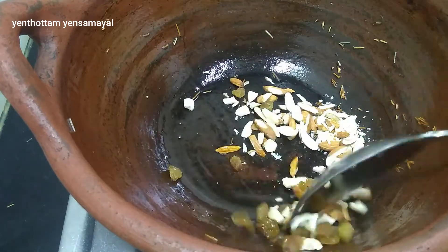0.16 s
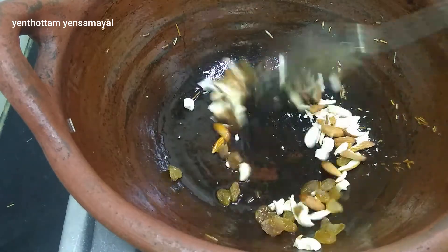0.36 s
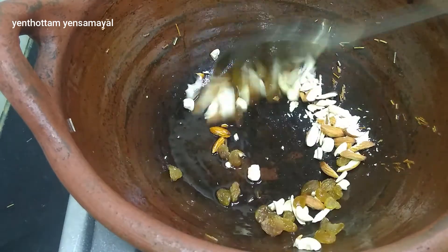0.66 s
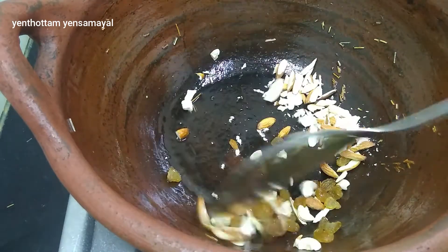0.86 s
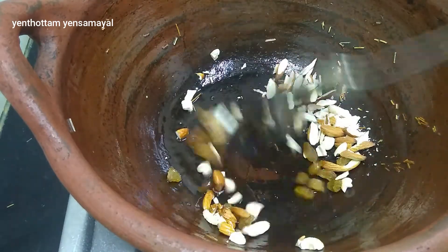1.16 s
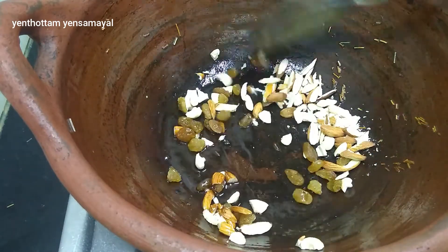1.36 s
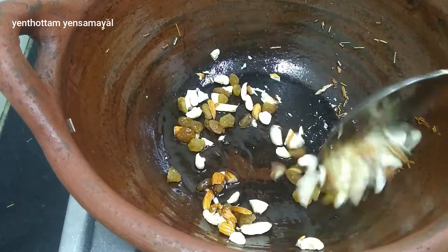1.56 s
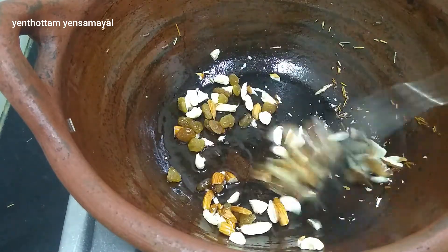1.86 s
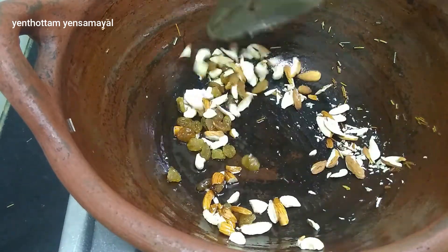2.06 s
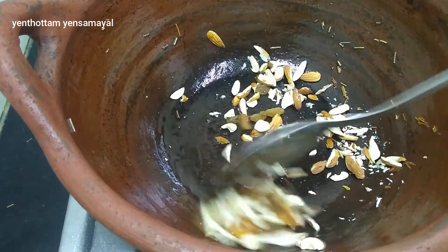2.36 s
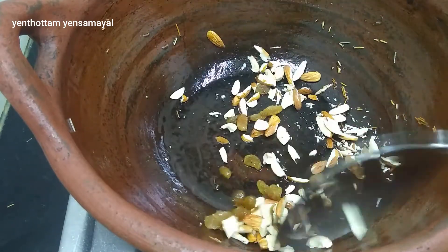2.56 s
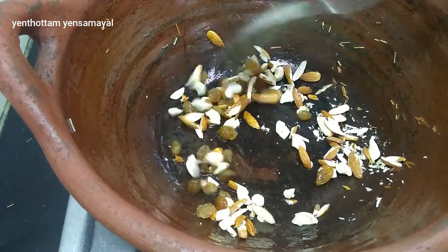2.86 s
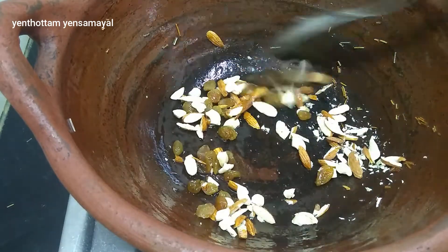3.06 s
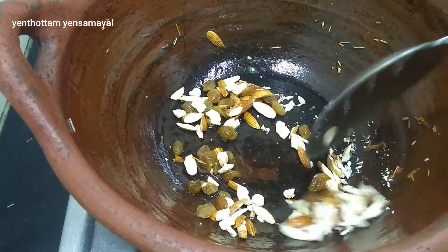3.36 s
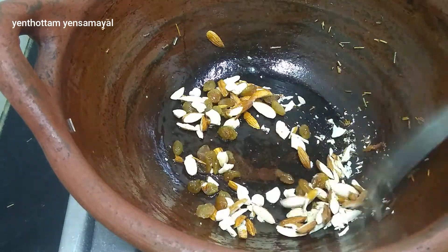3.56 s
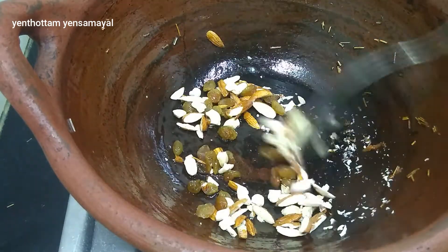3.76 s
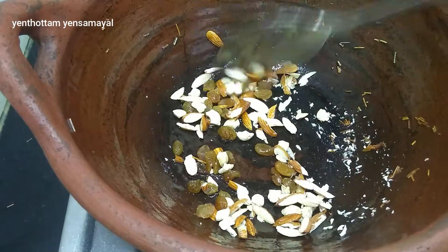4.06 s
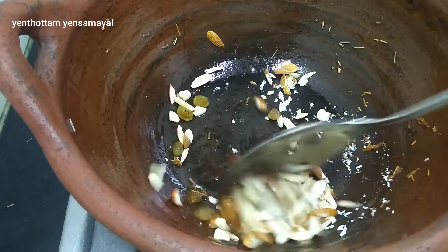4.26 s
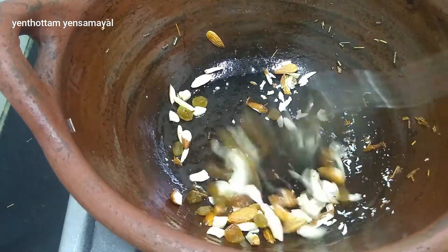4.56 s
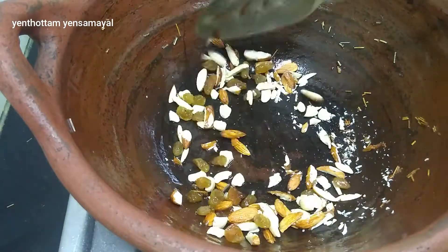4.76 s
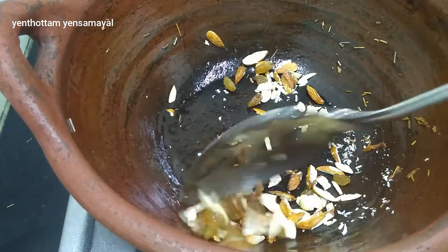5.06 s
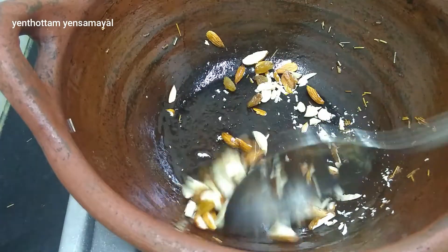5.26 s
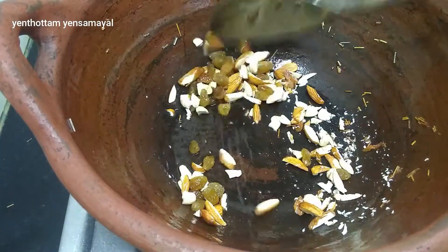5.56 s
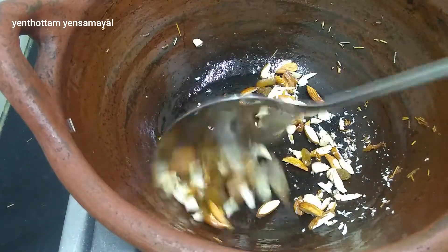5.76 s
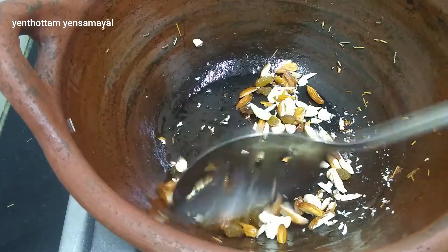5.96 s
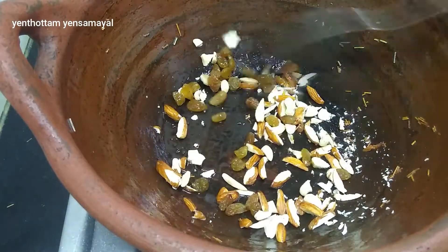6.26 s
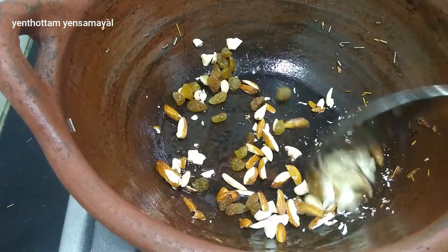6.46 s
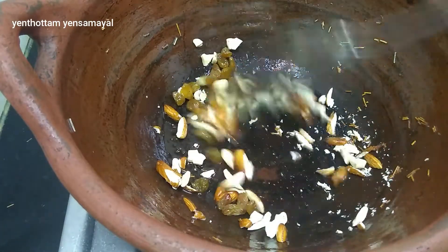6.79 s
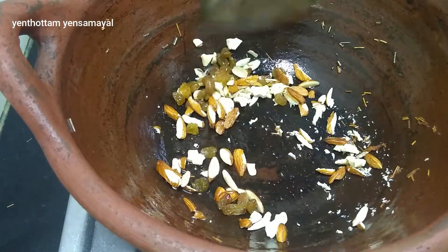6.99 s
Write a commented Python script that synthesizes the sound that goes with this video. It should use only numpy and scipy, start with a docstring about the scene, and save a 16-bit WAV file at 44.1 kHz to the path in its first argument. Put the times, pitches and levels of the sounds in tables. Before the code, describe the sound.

Close, regular knocks and short gritty scrapes of a steel spoon stirring nuts in a clay pot, with a brief kitchen echo.

```python
"""Hard-walled kitchen, close up: a steel spoon stirs nuts and raisins in a little hot fat in a clay pot.
Each stroke lands with a clack of pot and spoon, then drags over the gritty clay in tiny slips.
Loose nuts tick down; bubbles fizz faintly in the fat over a low murmur of air.
The room rings after every stroke; an expander after the microphone pair shuts the quietest gaps."""
import sys
import numpy as np
from scipy import signal
from scipy.fft import rfft, irfft, next_fast_len
from scipy.io import wavfile
from scipy.ndimage import uniform_filter1d

SR = 44100
rng = np.random.default_rng(int(sys.argv[2]) if len(sys.argv) > 2 else 0)


def dump(signal):
    """Clip the signal to [-1, 1] and save it as 16-bit WAV at the path in sys.argv[1]."""
    limited = np.clip(np.atleast_2d(signal).T, -1, 1)
    pcm = np.round(limited * 32767).astype(np.int16)
    wavfile.write(sys.argv[1], SR, pcm)


N = 314433

# spoon landings and bounces: (time [s], level [dB], tilt [0 flat, 1 on edge],
# spot [0 mid-floor, 1 foot of wall], low steel ring [dB], high steel ring [dB])
LANDINGS = [(0.7655, -35, .7, .05, -53, -45), (0.7785, -37, .7, .1, -60, -56),
            (0.784, -42, .7, 0, -65, -65), (1.159, -32.5, 0, .43, -55, -63),
            (1.548, -31, .75, .1, -41, -51), (1.5712, -42, .6, .3, -58, -62),
            (2.0562, -39, .75, 1, -49, -55), (2.369, -42, .9, .75, -54, -56),
            (2.785, -30.5, .05, .5, -52, -70), (3.3495, -37.5, .55, .8, -62, -55),
            (3.36, -41, .75, .85, -49, -60), (3.3719, -33.5, .5, .6, -54, -54),
            (3.3825, -42, .5, .5, -55, -62), (3.7625, -30, 0, .32, -56, -69),
            (4.239, -42, .6, .6, -51, -56), (4.7426, -33.5, .68, .74, -46, -52),
            (5.0185, -36, .87, .55, -49, -53), (5.402, -32, .41, .45, -52, -66),
            (5.7694, -37.5, .95, .05, -55, -60), (6.112, -34, .1, 1, -60, -74),
            (6.4624, -38, .7, .35, -55, -55), (6.485, -43, .7, .9, -60, -60), (6.8346, -33, 0, 0, -48, -70)]
# spoon hits the wall: (time [s], level [dB], cushion [0 bare clay, 1 through nuts])
KNOCKS = [(0.0204, -39, .2), (0.05, -38, .3), (0.0777, -36, 0), (0.0964, -32, 0), (0.1231, -35, .1),
          (0.441, -29, .4), (0.8492, -31, .8), (0.895, -39, .1), (0.907, -38, .3), (1.6414, -27, 0),
          (2.408, -40, .3), (2.515, -36, .7), (4.2811, -38, .8), (4.3071, -42, .4), (4.326, -38, .1),
          (4.335, -36.5, 0), (5.147, -35, .3), (5.5086, -44, 0), (6.5068, -26, 0), (6.5125, -37, 0),
          (6.9068, -37.5, .7)]
# spoon drags: (start [s], length [s], level [dB], bite [0 on nuts, 1 on bare clay], clay pitch [Hz])
DRAGS = [(0.0, .085, -44.5, .48, 1150), (0.39, .17, -56, 0, 1200), (0.852, .062, -46.5, .55, 1200),
         (2.39, .14, -50.5, .42, 1150), (2.955, .052, -63, .32, 1280), (3.14, .16, -73, .3, 1280),
         (3.868, .06, -52.5, .62, 1280), (4.226, .05, -50, .4, 1100), (4.277, .085, -53.5, .95, 1400),
         (4.632, .1, -60, 0, 1280), (5.022, .16, -47.5, .32, 1100), (5.512, .17, -65.5, .75, 1280),
         (5.828, .045, -52.5, .8, 1550), (6.12, .16, -54, 0, 1150), (6.905, .022, -49, .4, 1700)]
# one judder on the wall: (start [s], length [s], level [dB], clay pitch [Hz])
JUDDER = (4.749, .029, -35.5, 1130)
# nuts hit the pot: (time [s], level [dB])
NUT_TICKS = [(0.27, -44), (0.3127, -51), (0.335, -52), (0.821, -42), (1.489, -54), (1.9871, -50.5),
             (2.206, -43.5), (2.321, -50.5), (2.3872, -41), (2.4735, -43), (2.487, -36), (3.041, -55),
             (3.246, -58), (4.069, -49), (4.102, -54), (4.124, -53), (4.359, -38), (4.626, -49.5),
             (4.716, -46), (5.1325, -41), (5.262, -45)]
# joint modes of pot and spoon: (frequency [Hz], level [dB], t60 [s])
POT_MODES = [ (244, -18, 0.08), (326, -20, 0.4), (478, -7, 0.072), (542.4, -2.5, 0.033), (665, 7, 0.015),
             (825, -4, 0.011), (1114, -10.5, 0.072), (1187, -1.5, 0.038), (1313, 2, 0.0082),
             (1650, -10, 0.0061), (1917, 2, 0.018), (2058, 14, 0.0061), (2643, 11, 0.0079),
             (3144, 3.5, 0.019), (3455, 1.5, 0.013), (3757, 3.5, 0.012), (4200, 9.5, 0.0075),
             (5100, -8, 0.028), (5560, -16, 0.02), (8910, -2, 0.045), (10860, 1, 0.0034)]
# thin, lasting modes of the spoon: (frequency [Hz], level [dB], t60 [s])
STEEL_MODES = [(5536, -5, .1), (6949, 0, .14), (7025, -6, .12), (7268, 1, .14), (7595, -8, .1),
               (8215, -10, .14), (9071, -1, .17), (10718, -6, .13), (11490, -14, .12)]
# bands of the four parts, spoon bowl, pot belly, pot wall, spoon edge: (low [Hz], high [Hz])
PART_BANDS = [(2400, 7600), (215, 850), (850, 2300), (7800, 13800)]
# reverberation: (frequency [Hz], t60 [s], level [dB])
KITCHEN_DECAY = [(130, 0.71, -4.5), (253, 0.57, -5), (550, 0.63, -0.5), (1270, 0.6, 0.5),
                 (2170, 0.57, -3.5), (3240, 0.62, -6), (5670, 0.57, -2), (9000, 0.45, -4),
                 (14600, 0.51, -8.5)]
# air with two low humming resonances: (frequency [Hz], relative density [dB])
AIR_SPECTRUM = [(25, -20), (90, -7.5), (118, 0), (137, 18.5), (155, 0), (179, 14), (205, -1), (500, 0),
                (1500, -12), (5000, -18), (15000, -35)]
# colour of the microphone pair: (frequency [Hz], left minus right [dB])
PAIR_BALANCE = [(60, -10), (110, -1), (200, 6), (380, 1.5), (700, 0), (1290, 0.5), (2380, 0), (4400, -2),
                (8120, -5.5), (15000, -4.5)]

# part weights per kind of contact: (bowl [dB], belly [dB], wall [dB], edge [dB])
LANDING_DB, KNOCK_DB = np.array([3.5, -9.5, -15.5, -42]), np.array([-5.5, -7, -3.5, -28])
TICK_DB, DRAG_DB = np.array([-3.5, -16.5, -17, -37]), np.array([-6.5, -1.06, -14, -22.5])
JUDDER_DB = [-17, -20, 0, -28]
# added at full tilt, spot, cushion or bite, and in a skid: same columns
TILT_DB, SPOT_DB = np.array([0, 0, -2.5, 35]), np.array([-2.5, 3, 16, -1.5])
CUSHION_DB, BITE_DB = np.array([-5, 3.5, -2, -2]), np.array([9, -1.5, 19, 12.5])
SKID_DB = np.array([-22, -19, -23, -13])
# slopes with blow level: four parts, room send
HARD_DB_PER_DB, HARD_ROOM_DB_PER_DB = np.array([0.22, -0.27, 0.13, -0.047]), -0.39
# steel ring relative to a knock: (low [dB], high [dB])
KNOCK_RING_DB = np.array([-30, -36])

PORT_SPACING_S, TOP_HZ = .000438, 15600


def landings(floor_hz=1280, flat_hz=3420, on_edge_hz=2490, skid_s=.022):
    """The spoon lands and skids; tilt lowers the clink and brings out the bright edge."""
    out = np.zeros((3, N))
    for start_s, db, tilt, spot, *ring_db in LANDINGS:
        weights_db = LANDING_DB + tilt * TILT_DB + spot * SPOT_DB
        clink_hz = flat_hz + tilt * (on_edge_hz - flat_hz)
        add(out, start_s, tap(db, weights_db, ring_db, floor_hz, clink_hz, clay_width_hz=700))
        add(out, start_s, scrape(skid_s, db + weights_db + SKID_DB, floor_hz, attack_s=.002))
    return out


def knocks(wall_hz=1700, clink_hz=2910):
    """The spoon runs into the wall; jammed nuts dull the knock."""
    out = np.zeros((3, N))
    for start_s, db, cushion in KNOCKS:
        weights_db = KNOCK_DB + cushion * CUSHION_DB
        add(out, start_s, tap(db, weights_db, db + KNOCK_RING_DB, wall_hz, clink_hz, clay_width_hz=930))
    return out


def tap(db, weights_db, ring_db, clay_hz, clink_hz, clay_width_hz, length_s=0.0062, usual_db=-36):
    """Steel strikes clay: the pot clacks, the spoon rings on. Harder is brighter and drier."""
    out = np.zeros((3, SR // 3))
    hard_db = db - usual_db
    parts_db = db + weights_db + hard_db * HARD_DB_PER_DB
    room_db = 0.33 + hard_db * HARD_ROOM_DB_PER_DB
    add(out, 0, contact(blow(), parts_db, length_s, clay_hz, room_db, clay_width_hz, clink_hz))
    add(out, 0, steel_ring(ring_db))
    return out


def blow(chatter_gain=.4, chatter_s=.0015):
    """Impact force: one impulse, then brief settling chatter."""
    t = np.arange(SR // 50) / SR
    chatter = grains(len(t), per_s=5000, spread_db=3.7) * np.exp(-t / chatter_s)
    return (t == 0) + chatter_gain * unit(chatter)


def contact(force, parts_db, length_s, clay_hz=1300, room_db=0, clay_width_hz=800, clink_hz=3100):
    """A force rings the four parts, with energy proportional to length_s. Rows: left, right, room send."""
    sound = signal.fftconvolve(pot_response(), force[None], axes=1)
    bowl, belly, wall, edge = (band(sound, lo, hi) for lo, hi in PART_BANDS)
    wall = resonance(wall, clay_hz, clay_width_hz)
    bowl = bowl + undb(-2) * resonance(bowl, clink_hz, width_hz=600)
    mix = sum(undb(db) * unit(part) for part, db in zip((bowl, belly, wall, edge), parts_db))
    left, right = np.sqrt(length_s * SR) * mix
    return np.array([left, right, right * undb(room_db)])


def pot_response(scatter_db=2, left_lag_s=.0001, lag_spread_s=.00005, echo_db=-8, echo_s=0.0055):
    """Impulse response at both microphone ports: modes of pot and spoon, plus echoes inside the pot."""
    hz, db, t60_s = np.transpose(POT_MODES)[:, :, None]
    t = np.arange(SR // 4) / SR
    size, detune, direction = rng.standard_normal((3, len(hz), 1))
    hz = hz * (1 + np.minimum(0.00064 / t60_s, .025) * detune)  # damped modes shift with the spot hit
    ring = undb(db + scatter_db * size) * np.exp(2j * np.pi * hz * t) * decay(t, t60_s)
    lag_s = left_lag_s + lag_spread_s * direction  # each mode radiates from its own place
    left_ring = ring * np.exp(-2j * np.pi * hz * lag_s)
    modes = np.array([left_ring.imag.sum(0), ring.imag.sum(0)])
    echoes = band(diffuse_noise(len(t)), 300, 6000, order=1) * np.exp(-t / echo_s)
    return unit(modes) + undb(echo_db) * unit(echoes)


def steel_ring(ring_db, crossover_hz=(7600, 9000), gain_db=3, scatter_db=2):
    """The spoon rings on; the point that strikes weights its low and high modes."""
    hz, db, t60_s = np.transpose(STEEL_MODES)[:, :, None]
    t = np.arange(SR // 3) / SR
    db = gain_db + db + log_interp(hz, crossover_hz, ring_db) + scatter_db * rng.standard_normal(db.shape)
    ring = undb(db) * decay(t, t60_s) * np.sin(2 * np.pi * hz * t)
    return ring.sum(0) * np.array([[.6], [1], [.45]])  # left, right, room send


def drags(tumble_db=-4, tumble_bite_db=8):
    """The spoon pushes nuts along: a dull rumble, gritty where steel bites clay."""
    out = np.zeros((3, N))
    for start_s, length_s, db, bite, clay_hz in DRAGS:
        add(out, start_s, scrape(length_s, db + DRAG_DB + bite * BITE_DB, clay_hz))
        add(out, start_s, undb(db + tumble_db + bite * tumble_bite_db) * nut_tumble(length_s))
    return out


def judder():
    """The spoon judders on the wall, which sings at one pitch."""
    out = np.zeros((3, N))
    start_s, length_s, db, clay_hz = JUDDER
    parts_db = db + np.array(JUDDER_DB)
    add(out, start_s, scrape(length_s, parts_db, clay_hz, release_s=.005, clay_width_hz=450, room_db=-1.5))
    return out


def scrape(length_s, parts_db, clay_hz, attack_s=.008, release_s=.022, clay_width_hz=900, room_db=0.1):
    """The hand presses, holds and lets go; the edge catches and slips over fine grit."""
    t = np.arange(int(length_s * SR) + SR // 10) / SR
    pressure = np.minimum(t / attack_s, 1) * np.exp(-np.maximum(t - length_s, 0) / release_s)
    slips = unit(grains(len(t), per_s=230, spread_db=2.8))
    grit = undb(-7) * unit(grains(len(t), per_s=6000, spread_db=3.3))
    return contact((slips + grit) * pressure, parts_db, length_s, clay_hz, room_db, clay_width_hz)


def nut_ticks():
    """Light nuts drop back and click, hardly moving the heavy clay."""
    out = np.zeros((3, N))
    for start_s, db in NUT_TICKS:
        add(out, start_s, contact(blow(), db + TICK_DB, length_s=0.0087))
    return out


def nut_tumble(length_s, clicks_per_s=70, nut_hz=4300, spread_oct=.4, t60_s=.005, scatter_db=3.5):
    """Nuts click on each other and the clay, each at its own pitch; no room send."""
    out = np.zeros((3, SR // 2))
    t = np.arange(SR // 50) / SR
    starts_s = np.cumsum(rng.exponential(1 / clicks_per_s, size=32))
    for start_s, (pitch, size) in zip(starts_s, rng.standard_normal((32, 2))):
        if start_s < length_s:
            hz = min(nut_hz * 2 ** (spread_oct * pitch), TOP_HZ)
            click = undb(scatter_db * size) * np.sin(2 * np.pi * hz * t) * decay(t, t60_s)
            add(out[:2], start_s, click[None])
    return out


def kitchen_reverb(send, build_s=0.0016):
    """Dense wall echoes; the bass lasts longest."""
    hz, t60_s, db = np.transpose(KITCHEN_DECAY)
    t, bin_hz = np.arange(SR) / SR, np.fft.rfftfreq(SR, 1 / SR)
    spectrum = rfft(diffuse_noise(SR))
    onset = 1 - np.exp(-(t / build_s) ** 2)
    edges_hz = np.geomspace(40, SR / 2, 21)
    tail = 0
    for lo, hi in zip(edges_hz, edges_hz[1:]):
        centre_hz = np.sqrt(lo * hi)
        noise = irfft(spectrum * ((bin_hz >= lo) & (bin_hz < hi)))
        echoes = unit(noise * onset * decay(t, log_interp(centre_hz, hz, t60_s)))
        tail = tail + echoes * np.sqrt(2 * (hi - lo) / SR) * undb(log_interp(centre_hz, hz, db))
    return signal.fftconvolve(send, tail, axes=1)[:, :N]


def fat_fizz(rms_db=-84):
    """Tiny bubbles burst in the hot fat."""
    bursts = np.array([grains(N, per_s=1000, spread_db=5.5) for _ in range(2)])
    return np.sqrt(N) * undb(rms_db) * unit(band(bursts, 1900, 7600, order=2))


def room_air(rms_db=-72.5):
    """A steady low murmur with a hum in it."""
    shape_db = log_interp(np.fft.rfftfreq(N, 1 / SR), *np.transpose(AIR_SPECTRUM))
    murmur = irfft(rfft(diffuse_noise(N)) * undb(shape_db), N)
    return np.sqrt(N) * undb(rms_db) * unit(murmur)


def microphone_pair(ports, cancel=0.6):
    """Each channel subtracts the other port, delayed by their spacing, so the two face opposite ways."""
    size = next_fast_len(N + SR // 10)
    hz, spectra = np.fft.rfftfreq(size, 1 / SR), rfft(ports, size)
    delay = np.exp(-2j * np.pi * hz * PORT_SPACING_S)
    directional = spectra - cancel * delay * spectra[::-1]
    bass_loss = np.sqrt(1 + cancel ** 2 - 2 * cancel * delay.real * np.sinc(2 * hz * PORT_SPACING_S))
    balance = undb(log_interp(hz, *np.transpose(PAIR_BALANCE)) * np.array([[.5], [-.5]]))
    return irfft(directional * balance / bass_loss, size)[:, :N]


def expander(sound, threshold_db=-69, ratio=3, window_s=0.01):
    """Turns down whatever falls under the threshold; the detector ignores bass."""
    sidechain = band(sound, 220, TOP_HZ)
    power = uniform_filter1d(np.mean(sidechain ** 2, axis=0), int(window_s * SR))
    under_db = np.minimum(10 * np.log10(np.abs(power) + 1e-14) - threshold_db, 0)
    return sound * undb((ratio - 1) * under_db)


def diffuse_noise(count):
    """Noise from all sides at the two ports; long waves are alike at both."""
    coherence = np.sinc(2 * np.fft.rfftfreq(count, 1 / SR) * PORT_SPACING_S)
    mid, side = rfft(rng.standard_normal((2, count)))
    return irfft(mid * np.sqrt(1 + coherence) + side * np.sqrt(1 - coherence) * [[1], [-1]], count)


def grains(count, per_s, spread_db):
    """Random tiny impacts: many weak, a few strong."""
    hits = rng.random(count) < per_s / SR
    size = rng.standard_normal(count)
    return hits * size * undb(spread_db * np.minimum(rng.exponential(size=count), 3))


def resonance(x, hz, width_hz):
    return signal.lfilter(*signal.iirpeak(hz, hz / width_hz, fs=SR), x)


def band(x, low_hz, high_hz, order=4):
    return signal.sosfilt(signal.butter(order, [low_hz, high_hz], "band", fs=SR, output="sos"), x)


def decay(t, t60_s):
    return np.exp(-np.log(1000) * t / t60_s)


def log_interp(hz, points_hz, values):
    return np.interp(np.log(hz + 1e-9), np.log(points_hz), values)


def undb(db):
    return 10 ** (np.asarray(db) / 20)


def unit(x):
    """Scale to a mean energy of one per channel."""
    return x / np.sqrt(np.mean(np.sum(x ** 2, axis=-1)) + 1e-30)


def add(out, start_s, x):
    i = max(int(start_s * SR), 0)
    out[:, i:i + x.shape[1]] += x[:, :max(N - i, 0)]


def scene():
    """Pot slightly to the right, its reverberation, air and fizz."""
    stirring = landings() + knocks() + nut_ticks() + drags() + judder()
    direct, room_send = stirring[:2], stirring[2:]
    return direct + kitchen_reverb(room_send) + room_air() + fat_fizz()


def record(dry):
    """Microphone pair, expander, steep low-pass."""
    lowpass = signal.ellip(8, .2, 70, TOP_HZ, fs=SR, output="sos")
    return signal.sosfilt(lowpass, expander(microphone_pair(dry)))


dry = scene()
out = record(dry)
dump(out)
```